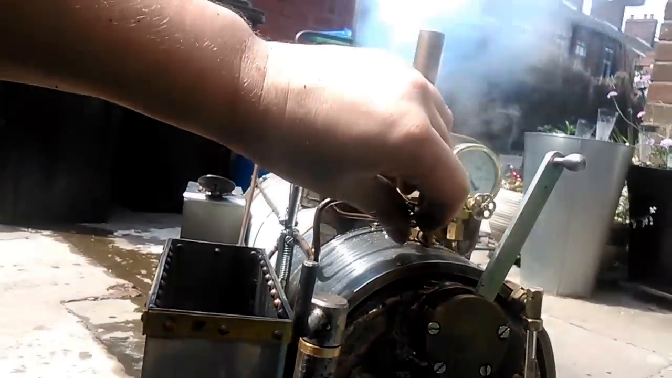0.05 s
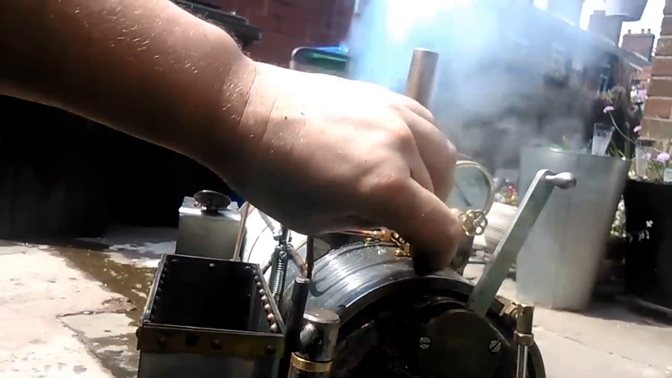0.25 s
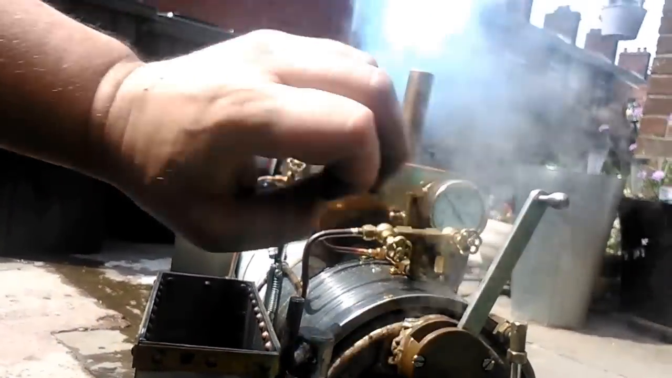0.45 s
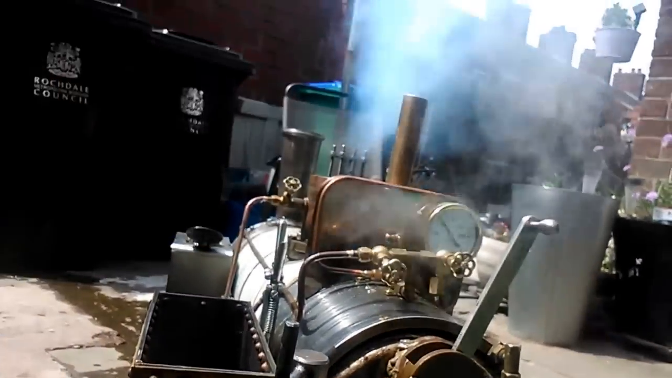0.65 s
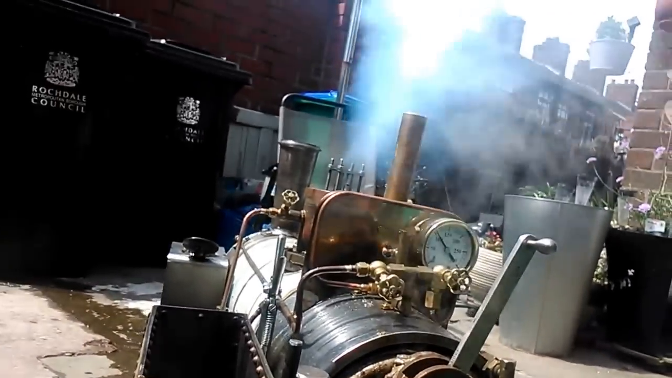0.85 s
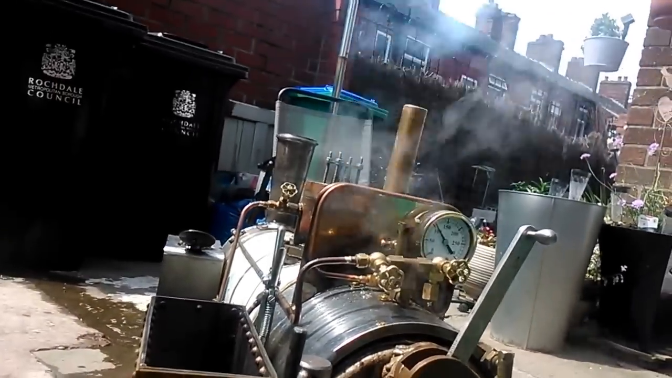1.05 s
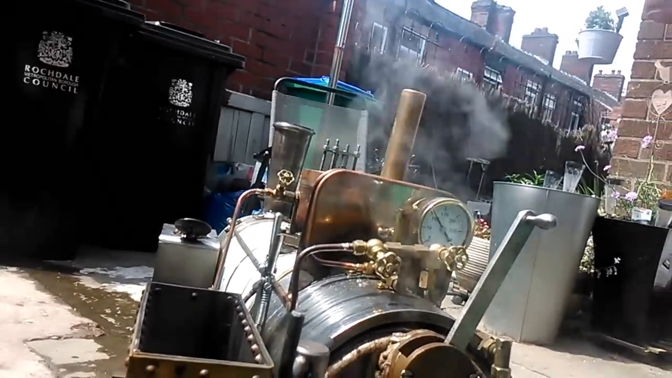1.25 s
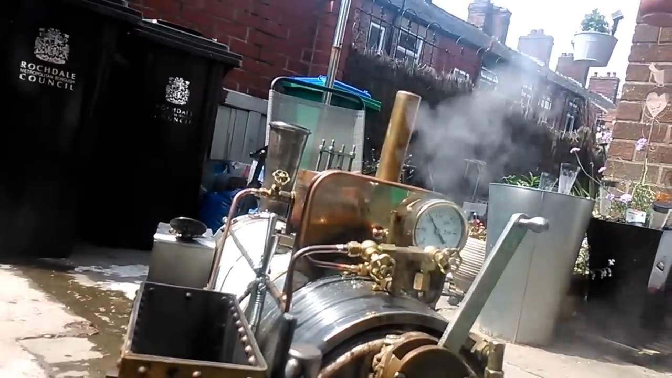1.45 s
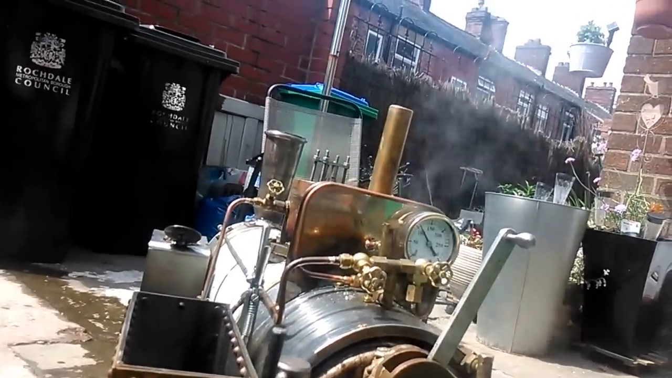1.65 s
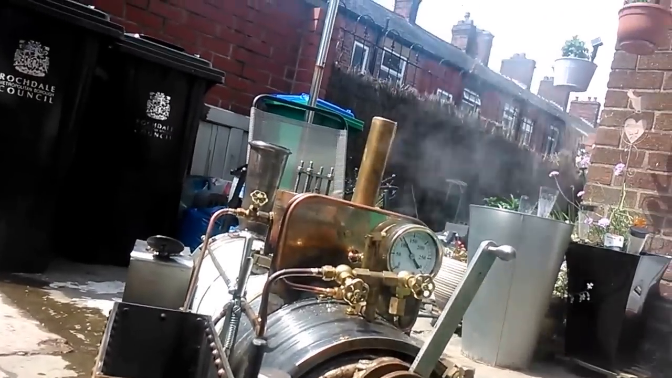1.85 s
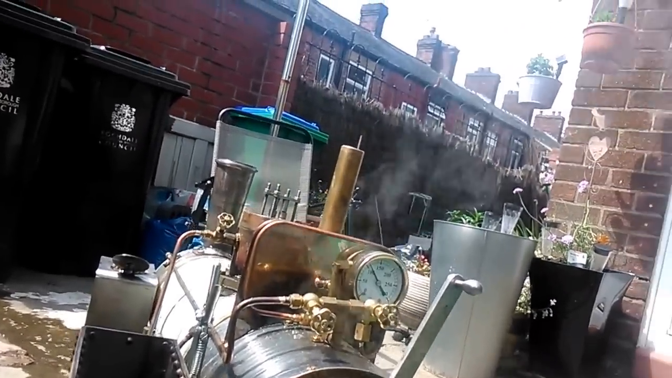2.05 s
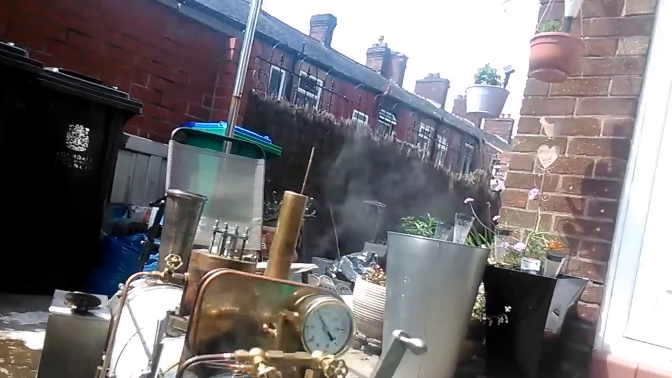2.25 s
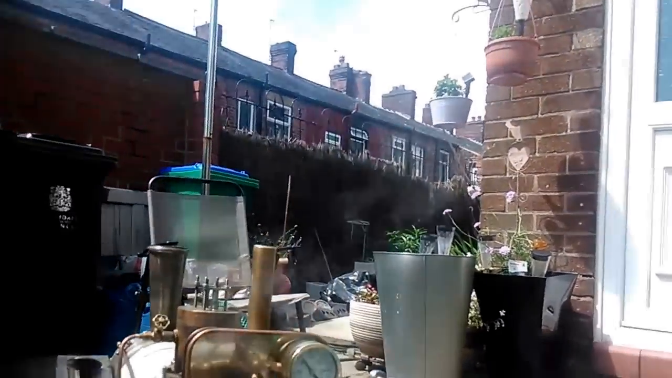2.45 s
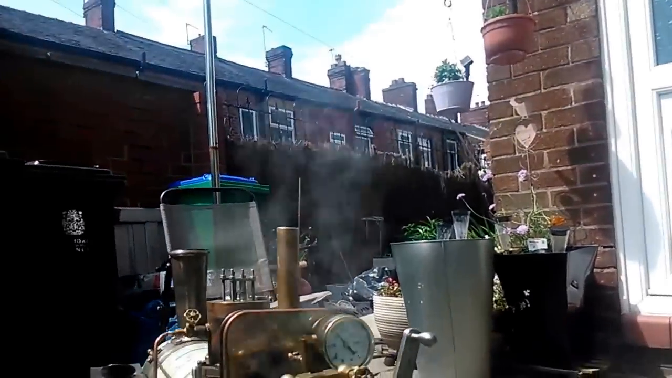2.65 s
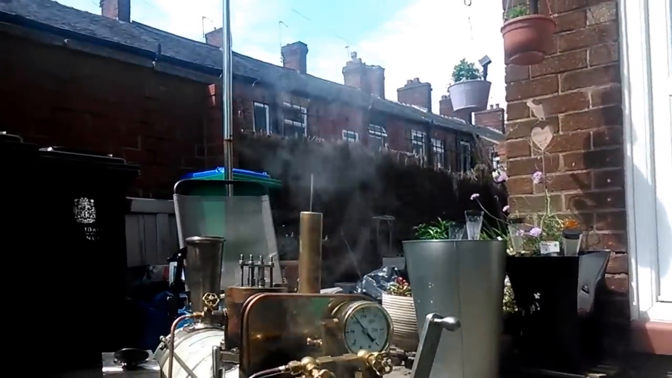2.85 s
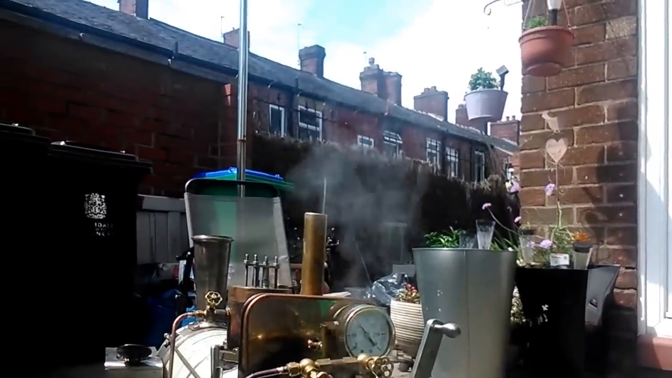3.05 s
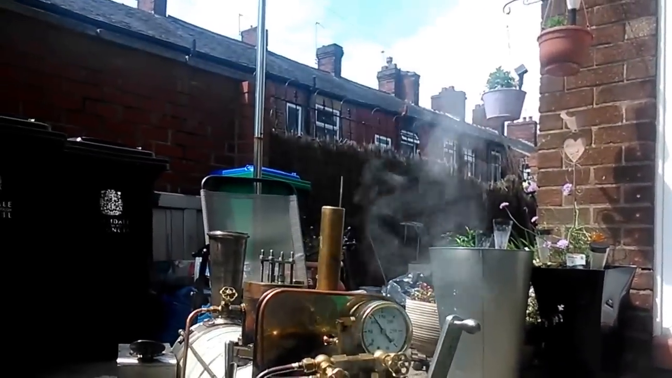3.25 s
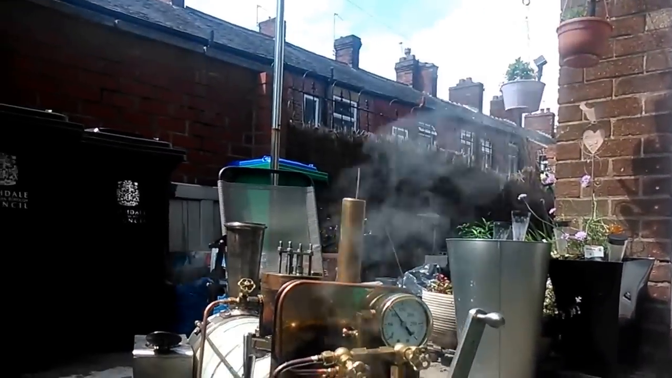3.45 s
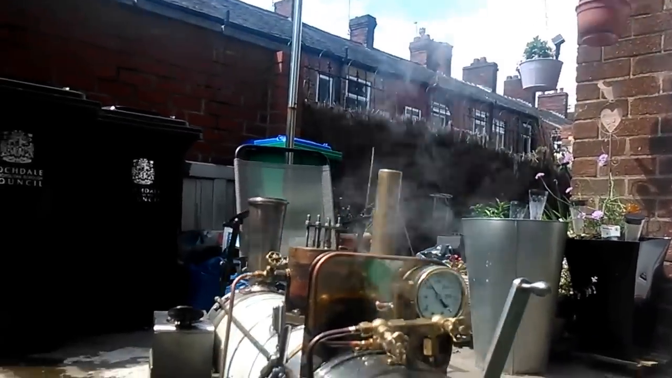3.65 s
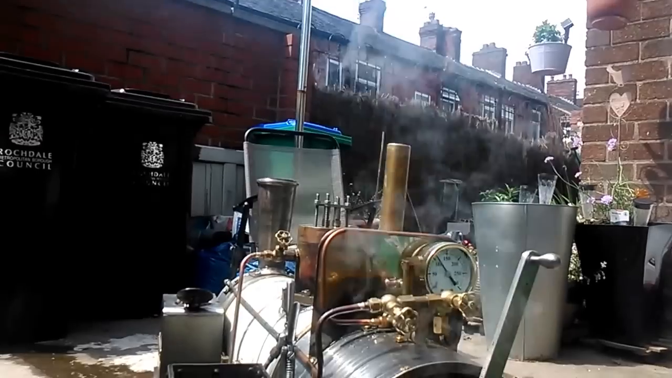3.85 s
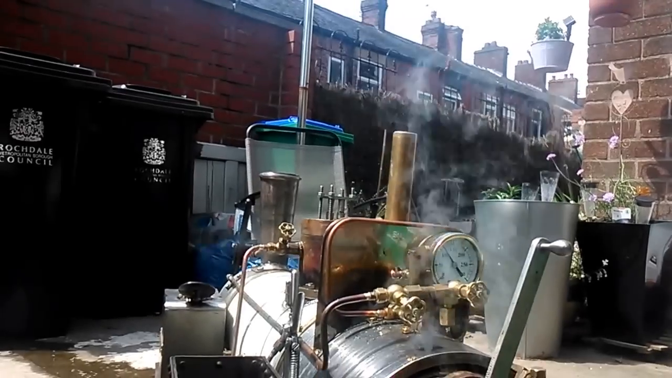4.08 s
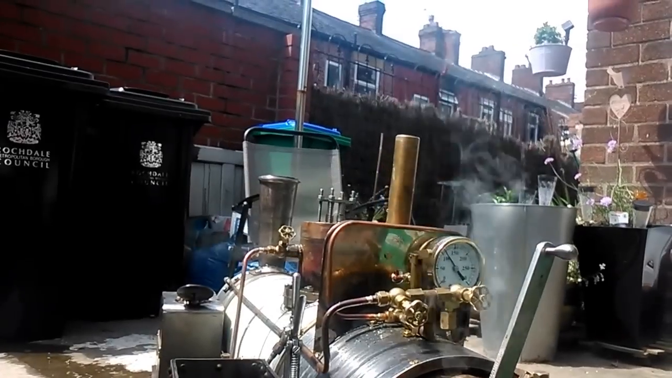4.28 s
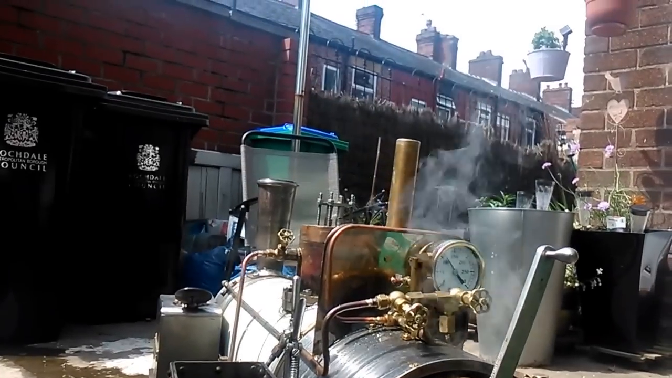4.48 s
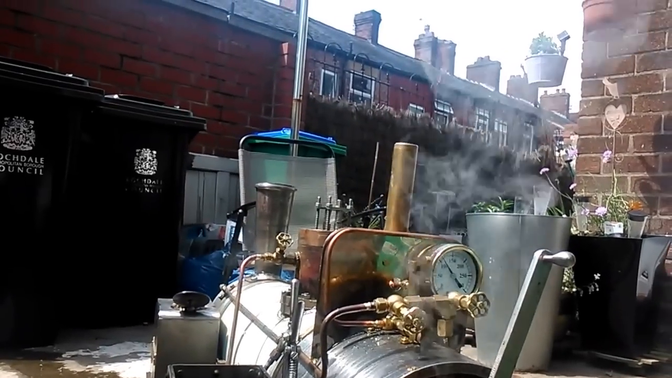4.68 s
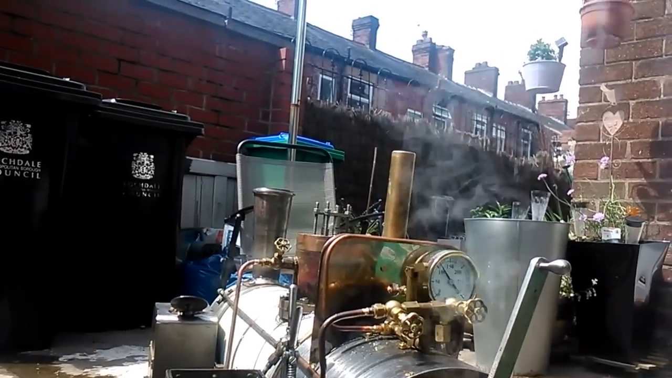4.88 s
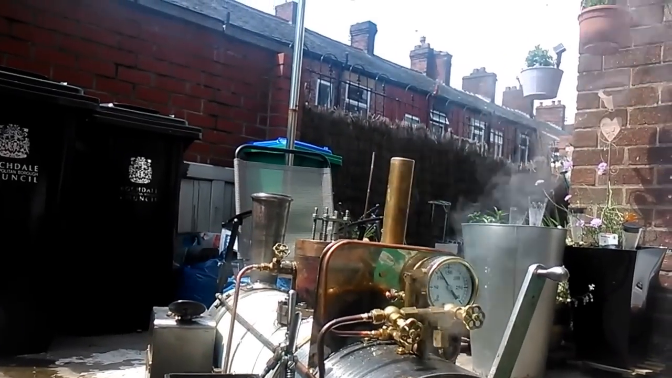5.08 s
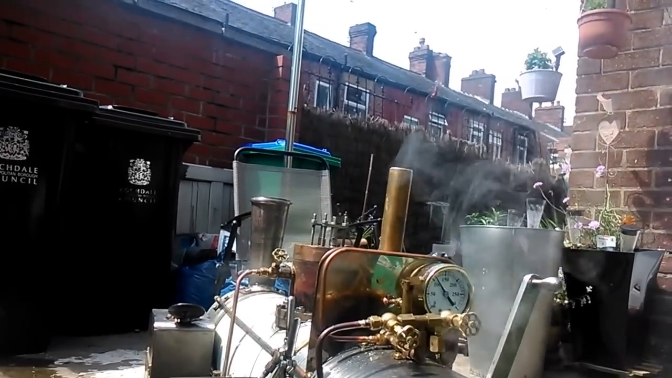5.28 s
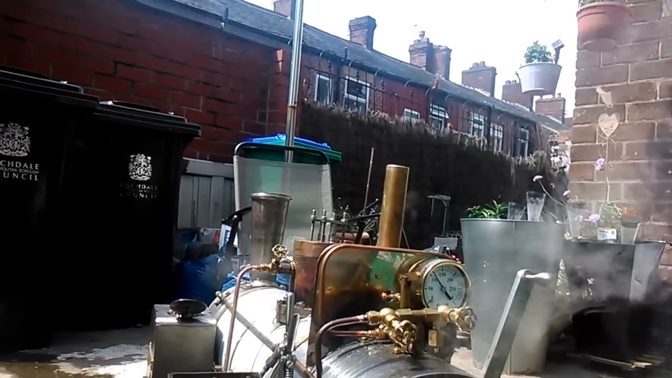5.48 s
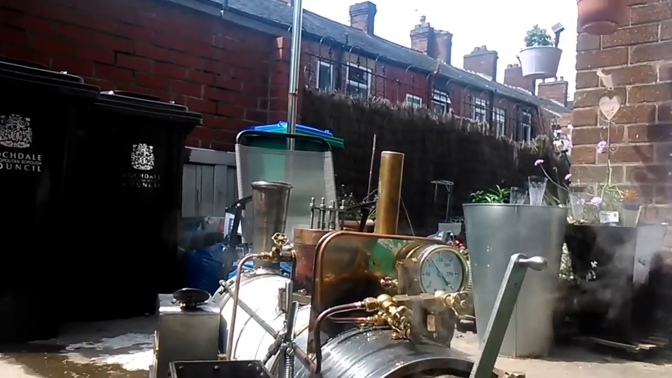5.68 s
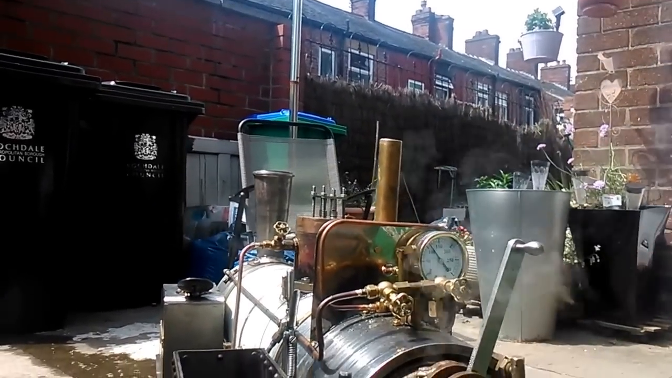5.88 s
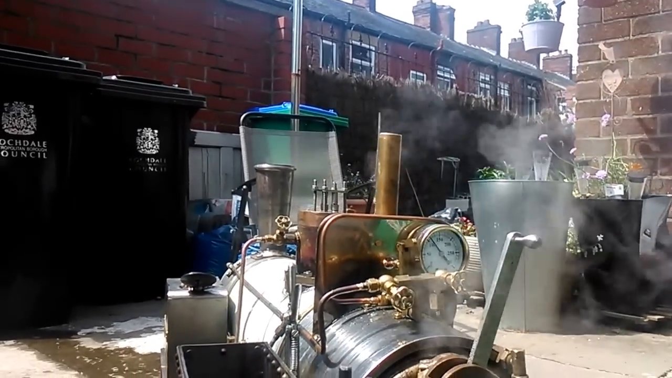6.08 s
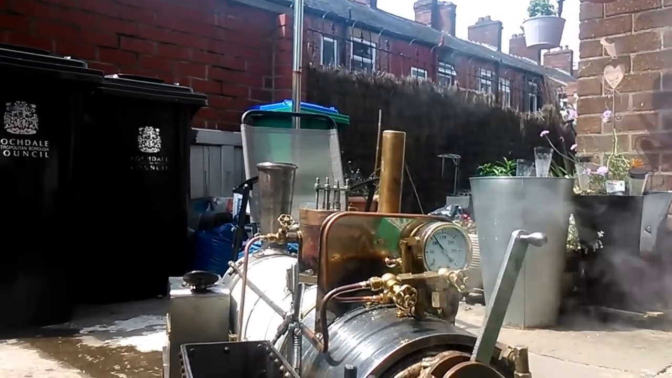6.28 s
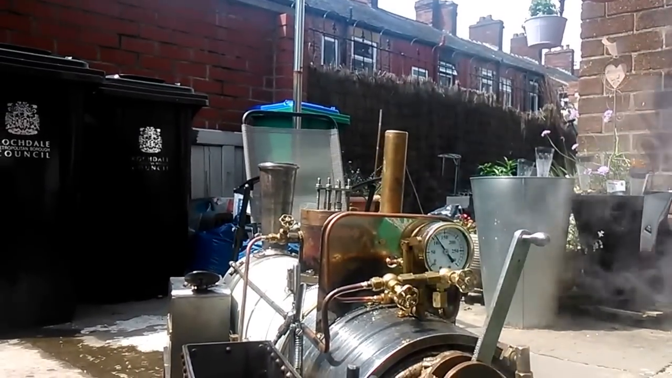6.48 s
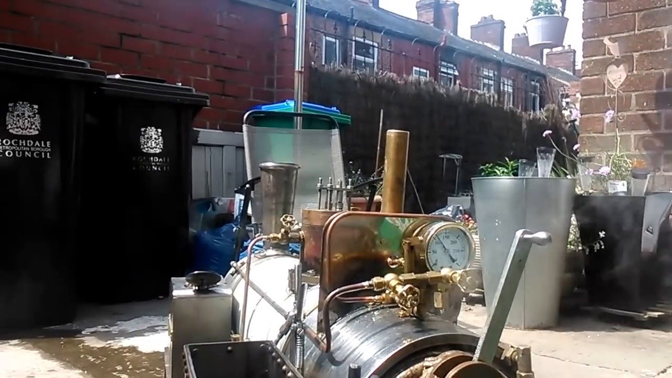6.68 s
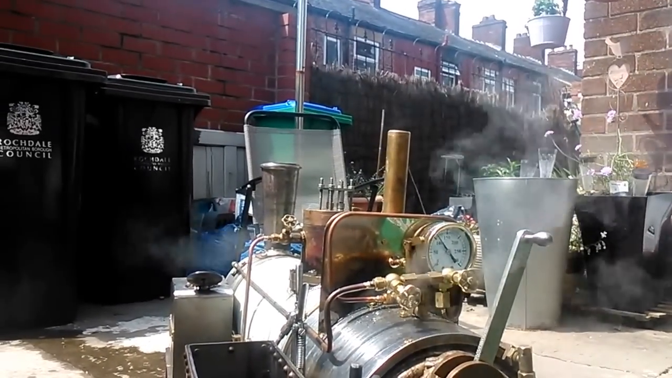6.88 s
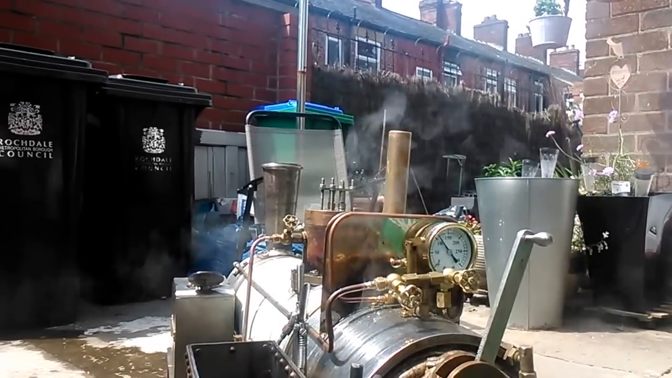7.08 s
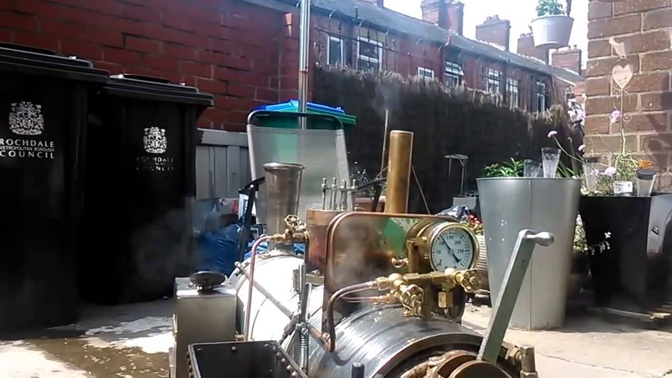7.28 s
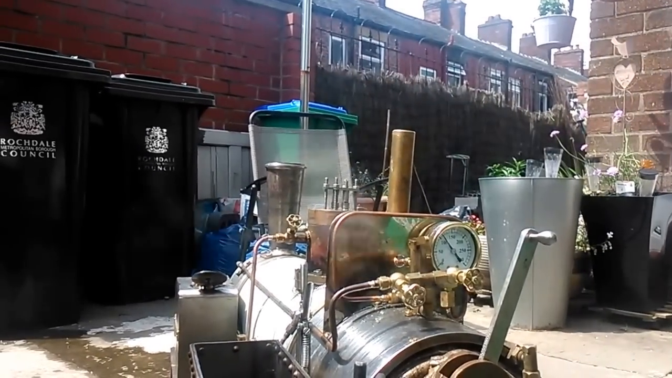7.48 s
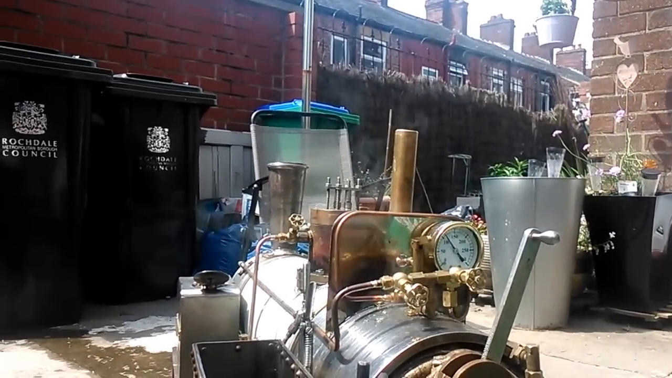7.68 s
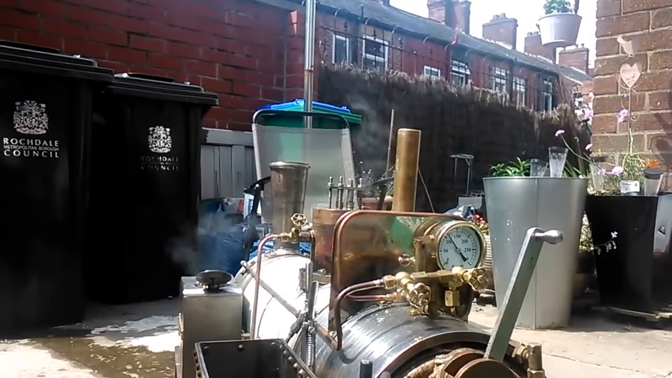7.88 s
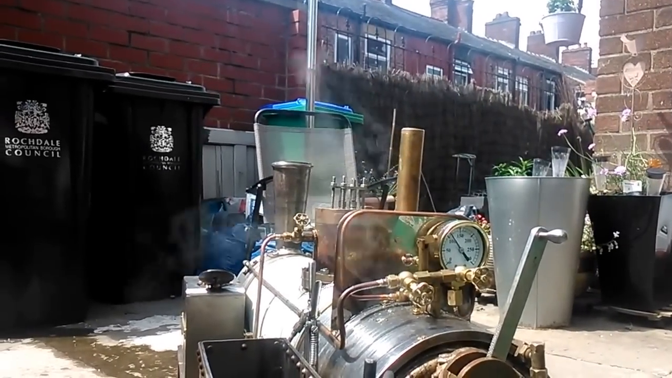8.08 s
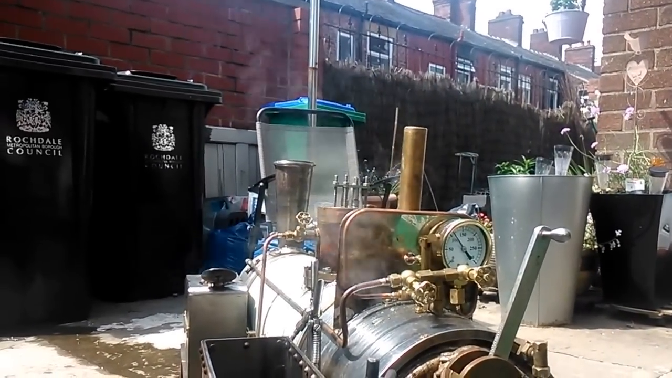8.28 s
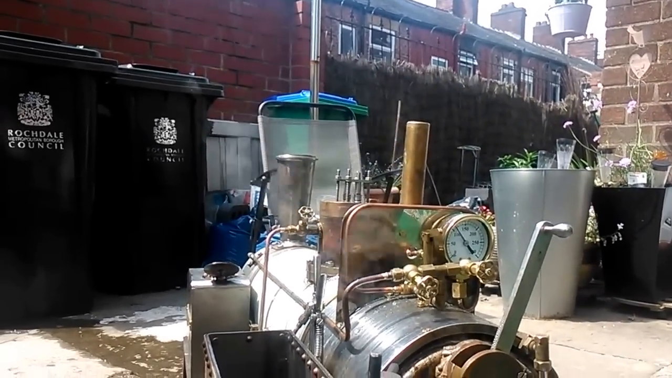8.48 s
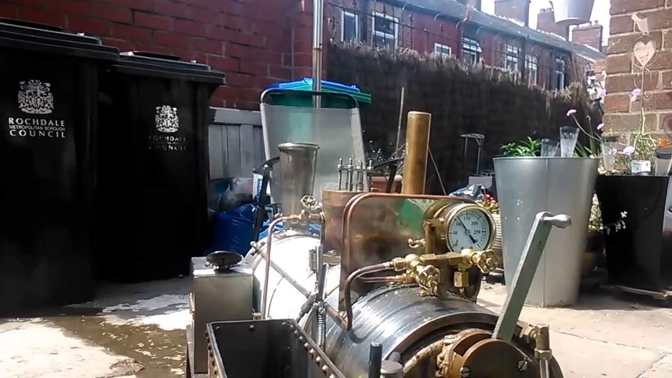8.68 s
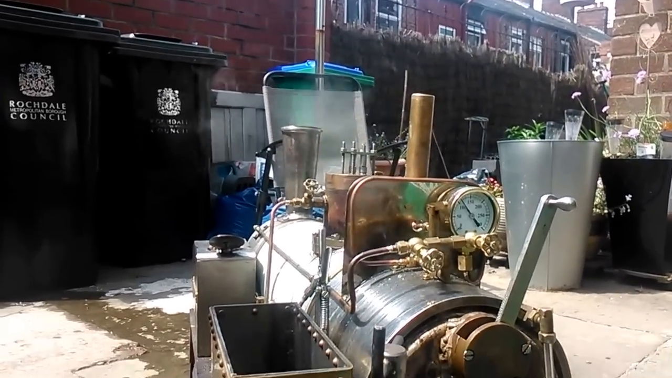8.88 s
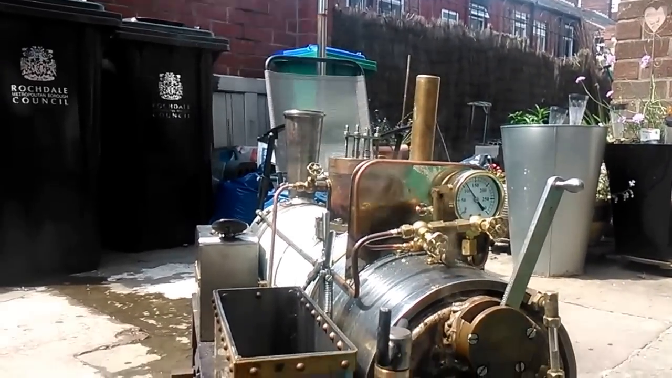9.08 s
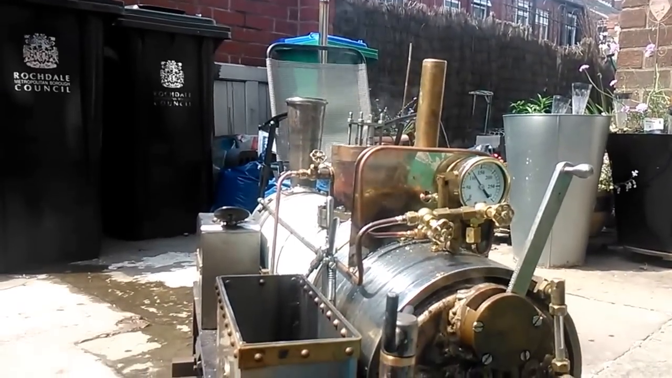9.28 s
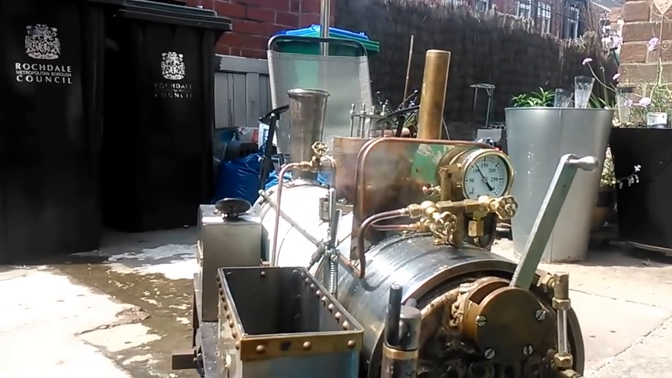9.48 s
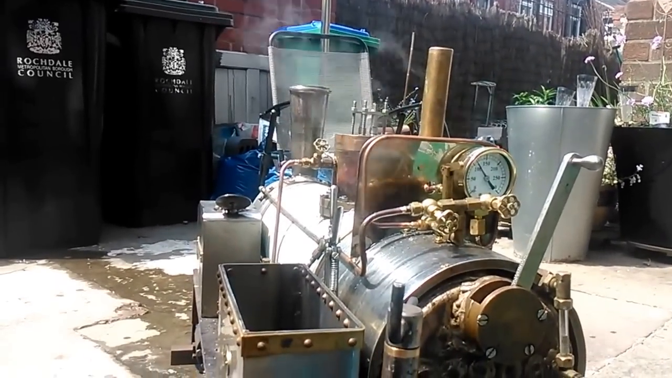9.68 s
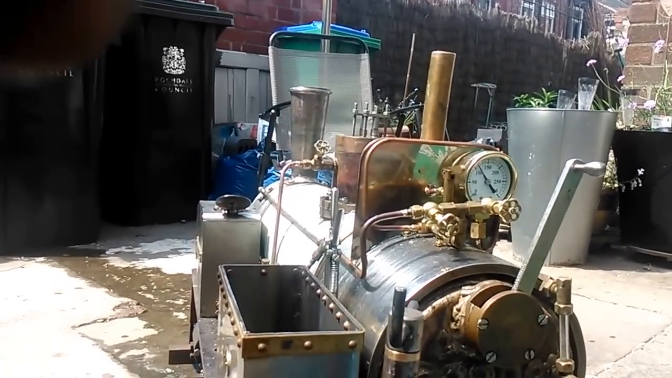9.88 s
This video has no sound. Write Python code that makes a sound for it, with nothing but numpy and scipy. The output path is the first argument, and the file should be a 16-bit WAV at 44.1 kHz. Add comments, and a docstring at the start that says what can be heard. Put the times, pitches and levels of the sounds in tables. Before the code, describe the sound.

Close outdoor sound of a miniature steam engine. A broad, loud steam roar dulls and stops abruptly just after one second. A tiny metallic clink follows, then a quick scraping clatter and a sharp strike that leaves a bright plate ringing. Afterwards only thin, fluttering steam leaks, irregular bubbling sputters in a pipe, and a low, soft fire murmur remain, dry and without echo.

```python
"""A model steam engine's blower roars up the chimney, as coloured noise, until its valve is shut.
A small steel tool clinks, scrapes and squeaks, and a struck plate rings: sums of fading sine waves and noise.
Leaking steam hisses as fluttering noise, with a wetter puff; water sputters as random clicks ringing a pipe.
A dull scuff and soft bumps are shaped noise, and the fire rumbles and murmurs softly as wavering noise.
Loud sound in the upper middle makes the recorder turn itself down for a moment."""
import sys
import numpy as np
from scipy import signal
from scipy.fft import rfft, irfft, next_fast_len
from scipy.io import wavfile

SR = 44100
rng = np.random.default_rng(int(sys.argv[2]) if len(sys.argv) > 2 else 0)


def pcm_store(signal):
    """Save signal as 16-bit PCM."""
    levels = np.round(np.clip(np.atleast_2d(signal), -1, 1) * 32767)
    wavfile.write(sys.argv[1], SR, levels.astype(np.int16).T)


N = 438354
TIME = np.arange(N) / SR  # s

# the tool touches metal: (time [s], level [dB], pitch that the spot favours [Hz])
TOOL_CONTACTS = [(1.461, -42.5, 11000), (1.474, -35, 6000), (1.4789, -21.5, 9760), (1.494, -39, 5300),
                 (2.262, -20, 4800), (2.284, -23, 7530), (2.296, -36, 10200), (2.308, -28, 9150),
                 (2.342, -45, 10300), (2.383, -34.5, 10700), (2.441, -37, 10400), (2.492, -35, 10900),
                 (2.556, -44, 6840), (2.591, -37, 11000)]
# tones at which the tool rings: (frequency [Hz], level [dB], time to fall by 60 dB [s])
TOOL_MODES = [(5346, -17, .36), (6085, -17, .1), (6800, -7, .16), (6852, -3.5, .15), (7962, -12, .24),
              (9076, -13, .22), (10260, -1.5, .1), (10330, -7, .08), (10450, -12, .09), (10950, -12, .13),
              (12040, -16, .11), (12450, -16, .11), (13080, -12, .11), (14330, -9, .1)]
# the blow that sets the plate ringing freely
BLOW_S = 2.592


def from_db(db):
    """Turn decibels into a gain."""
    return 10 ** (np.asarray(db) / 20)


def rms_one(x):
    """Scale a sound to an average strength (rms) of 1."""
    return x / np.sqrt(np.mean(x ** 2) + 1e-20)


def in_time(rows):
    """Join the points of each column with straight lines, giving a value at every sample."""
    s, *columns = np.transpose(rows)
    return [np.interp(TIME, s, column) for column in columns]


def since(s):
    """Seconds gone by since time s; zero before it."""
    return np.maximum(TIME - s, 0)


def gain_at(points, hz):
    """Gain of a (frequency [Hz], level [dB]) table, joined on a log-frequency axis."""
    f, db = np.transpose(points)
    return from_db(np.interp(np.log(hz), np.log(f), db))


def drift(rate):
    """Smooth random wandering with rms 1; a higher rate [Hz] wanders faster."""
    # made at a fortieth of the sample rate; the first 2000 values let the filter settle
    r = np.exp(-80 * np.pi * rate / SR)
    noise = rng.standard_normal(N // 40 + 2002)
    slow = signal.lfilter([1], [1, -2 * r, r * r], noise)[2000:]
    return np.interp(np.arange(N) / 40, np.arange(len(slow)), rms_one(slow))


def turbulence(spectrum, width=None):
    """Churning gas makes noise: random stereo sound of the given colour and width; rms 1."""
    # usual stereo width: (frequency [Hz], side level against mid [dB])
    usual_width = [(200, -47), (700, -32), (1400, -29), (2400, -13.5), (4400, -17), (8000, -27.5),
                   (15000, -110)]
    size = next_fast_len(N)
    hz = np.maximum(np.arange(size // 2 + 1) * SR / size, 1)
    mid, side = rfft(rng.standard_normal((2, size))) * gain_at(spectrum, hz)
    side = side * gain_at(usual_width if width is None else width, hz)
    return rms_one(irfft(np.array([mid + side, mid - side]), size)[:, :N])


def grains(per_s, spread_db):
    """Random clicks of uneven size and either sign; rms 1."""
    size_db = spread_db * np.minimum(rng.exponential(1, N), 4)
    sizes = from_db(size_db) * rng.choice([-1, 1], N)
    return rms_one(sizes * (rng.random(N) < per_s / SR))


def resonate(x, hz, width_hz):
    """Bring out one pitch, with gain 1 on top; a narrower width rings longer."""
    r = np.exp(-np.pi * width_hz / SR)
    feedback = [1, -2 * r * np.cos(2 * np.pi * hz / SR), r * r]
    return signal.lfilter(np.array([1, 0, -1]) * (1 - r * r) / 2, feedback, x + 1e-18)


def cut(x, hz, kind, order=2):
    """Keep only what lies below ("low") or above ("high") a frequency."""
    sections = signal.butter(order, min(hz, SR / 2 - 1), kind, fs=SR, output="sos")
    return signal.sosfilt(sections, x)


def smooth(x, seconds):
    """Follow x with a lag."""
    r = np.exp(-1 / (seconds * SR))
    return signal.lfilter([1 - r], [1, -r], x + 1e-18)


def add(out, s, sound):
    """Mix a sound in from time s."""
    at = round(s * SR)
    out[..., at:at + sound.shape[-1]] += sound[..., :N - at]


def blower(split_hz=2000):
    """The jet roars steadily in the chimney, dulls as the valve closes and ends in a thin hiss."""
    # colour of the roar: (frequency [Hz], relative level per Hz [dB])
    roar_colour = [(20, -34), (30, -25), (58, -4), (85, -3.5), (300, -3.5), (650, -3.5), (1000, -4),
                   (1550, -5), (2700, -6.5), (4500, -12), (7400, -17.5), (10000, -19), (14000, -21),
                   (16000, -25)]
    # stereo width of the jet: (frequency [Hz], side level against mid [dB])
    jet_width = [(3000, -60), (3900, -15), (8000, -14)]
    # the roar sags while the valve is turned, then dies as it seats
    blower_db, turn_s, sag_db_per_s, dull_db_per_s = -15.5, 1.05, 14, 14
    shut_s, shut_db_per_s = 1.176, 600
    # trapped steam bleeds off
    bleed_db, bleed_end_s, bleed_db_per_s, bleed_low_hz = -43.5, 1.324, 165.5, 3000

    jet = turbulence(roar_colour, jet_width)
    treble = from_db(-dull_db_per_s * since(turn_s))
    roar = treble * jet + (1 - treble) * cut(jet, split_hz, "low")
    roar_db = blower_db - sag_db_per_s * since(turn_s) - shut_db_per_s * since(shut_s)
    bleed = cut(jet, bleed_low_hz, "high", order=4) * (TIME > shut_s)
    bleed_gain = from_db(bleed_db - bleed_db_per_s * since(bleed_end_s))
    return from_db(roar_db) * roar + bleed_gain * bleed


def strike(modes, level_db, emphasis_db, lead=0.0028, vary_db=2.2, contact_s=0.0017):
    """One blow rings every mode, each with its own emphasis; the left leads by a tiny phase [rad]."""
    t, out = TIME[:SR], 0
    phase = np.array([[lead], [-lead]])
    for (hz, db, t60), extra_db in zip(modes, emphasis_db):
        height_db = level_db + db + extra_db + vary_db * rng.standard_normal()
        out = out + from_db(height_db - 60 * t / t60) * np.sin(2 * np.pi * hz * t + phase)
    # the swing builds up while the parts touch
    return out * (1 - np.exp(-(t / contact_s) ** 2))


def tool(crack_db=-5, crack_t60=0.022, crack_hz=5000, tick_db=-17, tick_t60=0.022):
    """Each contact rings the tool, with a brief gritty crack and a fainter, full-bodied tick."""
    # the spot where the tool touches brings out the modes near one pitch
    most_favour_db, favour_octaves = 15, 0.21
    out, t, tool_hz = np.zeros((2, N)), TIME[:SR], np.array(TOOL_MODES)[:, 0]
    for s, tool_db, favoured_hz in TOOL_CONTACTS:
        octaves_off = np.log2(tool_hz / favoured_hz)
        favour_db = most_favour_db * np.exp(-(octaves_off / favour_octaves) ** 2)
        ring = strike(TOOL_MODES, tool_db, favour_db)
        grit = from_db(tool_db + crack_db - 60 * t / crack_t60) * rng.standard_normal(SR)
        crack = cut(grit, crack_hz, "high", order=6)
        tick = from_db(tool_db + tick_db - 60 * t / tick_t60) * rng.standard_normal(SR)
        add(out, s, ring + crack + tick)
    return out


def scrape():
    """Around each contact the tool drags over the metal; the tiny slips keep its modes ringing unevenly."""
    scrape_db, ring_db, rise_s, fall_s, low_hz = -12, 25.5, 0.0034, 0.015, 5300
    drag = np.zeros(N)
    for s, tool_db, *_ in TOOL_CONTACTS:
        fade = np.maximum((s - TIME) / rise_s, (TIME - s) / fall_s)
        drag += from_db(tool_db) * np.exp(-np.minimum(fade, 20))
    slips = drag * cut(grains(per_s=3800, spread_db=0.0), low_hz, "high", order=6)
    ringing = 0
    for hz, db, t60 in TOOL_MODES:
        width_hz = np.log(1000) / (np.pi * t60)  # a long ring means a narrow resonance
        ringing = ringing + from_db(db) * resonate(slips, hz, width_hz)
    return from_db(scrape_db) * slips + from_db(ring_db) * ringing


def squeaks(rough_db=3):
    """The tool skids on the plate: a gritty chirp that shoots up in pitch."""
    # skids: (time [s], level [dB])
    skids = [(2.307, -35), (2.3395, -43), (2.381, -33), (2.404, -42), (2.44, -31), (2.59, -31)]
    start_hz, hz_per_s, swell_s = 3140, 140000, 0.0012
    out, t = np.zeros(N), TIME[:SR // 60]
    age = t / swell_s
    swell = age * np.exp(1 - age)
    chirp = swell * np.sin(2 * np.pi * (start_hz * t + .5 * hz_per_s * t ** 2))
    for s, db in skids:
        add(out, s, from_db(db) * chirp)
    return out * from_db(rough_db * drift(200))


def held_plate(contact_s=0.0013, chatter_db=2.7):
    """Each nudge stops the held plate's ring and starts a new one; the loose grip makes it chatter."""
    # nudges: (time [s], low mode level [dB], middle pair level [dB], high mode level [dB])
    nudges = [(1.465, -44, -70, -70), (1.5, -57, -73, -75), (2.262, -35, -64, -49),
              (2.309, -34.5, -59, -65), (2.343, -44, -65, -70), (2.383, -24.5, -39, -62),
              (2.406, -33.5, -52, -65), (2.441, -30, -48, -60), (2.466, -40, -50, -63),
              (2.493, -34, -39, -40), (2.557, -31, -48, -36)]
    # tones of the held plate: (frequency [Hz], time to fall by 60 dB [s], column of nudges [index])
    held_modes = [(3079, .8, 1), (3908, .2, 2), (4091, .22, 2), (4938, 1.5, 3)]
    out = 0
    for hz, t60, column in held_modes:
        swing = np.zeros(N)
        for row in nudges:
            fresh = from_db(row[column] - 60 * since(row[0]) / t60)
            swing = np.where(TIME < row[0], swing, fresh)
        swing = smooth(swing * (TIME < BLOW_S), contact_s)
        out = out + swing * from_db(chatter_db * drift(60)) * np.sin(2 * np.pi * hz * TIME)
    return out


def knock(knock_db=-27, knock_t60=0.026, low_hz=1300, high_hz=4200, crack_db=-31, crack_t60=.023):
    """The blow itself: a sharp crack and a short clatter that gives the ring its body."""
    out, t = np.zeros(N), TIME[:SR // 4]
    clatter, crack = rng.standard_normal((2, len(t)))
    clatter = rms_one(cut(clatter, high_hz, "low", order=4)) * from_db(knock_db - 60 * t / knock_t60)
    crack = crack * from_db(crack_db - 60 * t / crack_t60)
    add(out, BLOW_S, cut(clatter + crack, low_hz, "high", order=6))
    return out


def free_plate(long_share=0.51, settle_t60=0.34, contact_s=0.0028, low_build_s=0.0057,
               waver_db=1.3, sway_hz=0.45, stilled_s=2.99, stilled_t60=1.0):
    """The struck plate loses part of its swing quickly, then sings on, wavering as it sways, until damped."""
    # tones of the free plate: (frequency [Hz], level [dB], time to fall by 60 dB [s])
    plate_modes = [(1427, -28, .45), (1500, -32, .3), (2331, -22, .19), (2990, -27, .15), (3760, -20, .09),
                   (3908.5, -8.5, 1.15), (4090.5, -1, 1.2), (4270, -21, .09), (4939, -7.5, .7),
                   (5351, -18, .75), (6008, -29, 1.0), (6088, -25, 1.05), (6864, -28, .3), (8603, -29, .4),
                   (9884, -24, .3), (11220, -29, .4), (14320, -27, .15)]
    blow_db = -10
    # the lowest mode splits into a beating pair once the plate lifts clear
    low_hz, split_hz, low_db, twin_db, low_t60, clear_s = 3079, 21.7, -6, 0.5, 1.4, 0.013
    t = since(BLOW_S)
    settle = long_share + (1 - long_share) * from_db(-60 * t / settle_t60)

    def partial(hz, db, t60, ahead=0):
        """One decaying mode, a little unsteady in level and pitch; ahead is in cycles."""
        sway = np.cumsum(sway_hz * drift(9.1) * (t > 0)) / SR
        cycles = hz * t + ahead + sway
        return from_db(db - 60 * t / t60 + waver_db * drift(12)) * np.sin(2 * np.pi * cycles)

    upper = sum(partial(hz, db, t60) for hz, db, t60 in plate_modes) * settle
    low = partial(low_hz, low_db, low_t60)
    twin = partial(low_hz, low_db + twin_db, low_t60, split_hz * since(BLOW_S + clear_s))
    upper = upper * (1 - np.exp(-(t / contact_s) ** 2))
    pair = (low + twin) * long_share * (1 - np.exp(-t / low_build_s))
    return (upper + pair) * from_db(blow_db - 60 * since(stilled_s) / stilled_t60)


def uneven(x, patchy_db=4.0, per_s=6, count=22):
    """Narrow bands of a hiss wax and wane, each by itself; rms 1."""
    size = next_fast_len(N)
    spectrum, hz = rfft(x, size), np.arange(size // 2 + 1) * SR / size
    centres = np.geomspace(3000, 8000, count)
    out = 0
    for share in np.eye(count):
        band = irfft(spectrum * np.interp(hz, centres, share), size)[:, :N]
        out = out + band * from_db(patchy_db * drift(per_s))
    return rms_one(out)


def leaks(spit_db=-12, spit_hz=6500, easing_s=0.073, flutter_db=1.16, seep_db=-56, seep_flutter_db=1.6):
    """Thin jets hiss and flutter at the fittings, at times whistling, with a fine crackle of droplets."""
    # leaking steam: (time [s], hiss level [dB], level of the finest, highest jet [dB])
    leak_levels = [(1.28, -38.5, -50), (1.41, -57, -45), (1.54, -38.5, -39.5), (2.05, -42.5, -42.5),
                   (2.2, -46, -37.5), (2.3, -39, -42), (2.55, -35.5, -38), (2.75, -42, -47),
                   (3.07, -41, -39), (3.23, -49.5, -49), (3.43, -38, -37), (3.6, -41.5, -42.5),
                   (3.85, -46, -45), (4.08, -45.5, -46), (4.2, -40, -41), (4.35, -43.5, -45),
                   (4.68, -46.5, -48), (4.85, -43, -43), (5.25, -43, -42), (5.5, -38.5, -39.5),
                   (5.75, -41, -40), (6.2, -42.5, -38.5), (6.6, -42, -40.5), (7.2, -40.5, -40.5),
                   (7.7, -40.5, -39), (8.2, -44, -40.5), (8.35, -41.5, -41), (8.6, -43.5, -39),
                   (8.8, -41, -42.5), (9.2, -43, -43), (9.37, -39.5, -41), (9.94, -45.5, -47.5)]
    # edges and faint whistles: (start [s], end [s], frequency [Hz], width [Hz], gain on the jets [dB])
    whistle_rows = [(1.3, 2.198, 8900, 1500, 2), (3.4, 4.1, 14450, 200, -7), (3.3, 4.7, 9900, 2500, -23),
                    (4.15, 4.65, 9800, 180, 4), (5.2, 6.2, 9950, 100, -10), (5.3, 8.7, 14500, 200, -7)]
    # colours of hiss, finest jet and seeping steam: (frequency [Hz], relative level per Hz [dB])
    hiss_colour = [(3000, -35), (4600, -20.5), (6200, -13), (7000, -9), (8000, -7), (9500, 0), (10800, 0.5),
                   (12000, -3), (14000, -20), (16000, -35)]
    fine_colour = [(8000, -28), (10500, -7.5), (12000, -1), (13500, 0.5), (15500, -.5), (16500, 0),
                   (18000, -40)]
    seep_colour = [(2000, -23), (3000, -0.5), (3700, 1), (4100, 2), (4550, -5.5), (5000, -1), (5550, 0.5),
                   (6100, -6.5), (6900, 0), (9000, -28), (14000, -40)]

    hiss_db, fine_db = in_time(leak_levels)
    droplets = grains(per_s=500, spread_db=4)
    crackle = from_db(spit_db) * cut(droplets, spit_hz, "high", order=4)
    hiss = from_db(hiss_db + flutter_db * drift(11)) * (turbulence(hiss_colour) + crackle)
    fine = from_db(fine_db + flutter_db * drift(20)) * turbulence(fine_colour)
    jets = hiss + fine
    whistles = 0
    for start, end, hz, width, db in whistle_rows:
        swell = .5 * (np.tanh((TIME - start) / easing_s) - np.tanh((TIME - end) / easing_s))
        whistles = whistles + swell * from_db(db) * resonate(jets, hz, width)
    seep = from_db(seep_db + seep_flutter_db * drift(20)) * uneven(turbulence(seep_colour))
    return jets + whistles + seep


def puff():
    """A spit of wetter, lower-pitched steam from one fitting swells quickly and trails off."""
    # colour of the puff: (frequency [Hz], relative level per Hz [dB])
    puff_colour = [(2500, -18), (3400, -1), (4500, -8), (5600, 3), (7500, -20), (10000, -25)]
    start_s, level_db, rise_s, fall_db_per_s = 5.95, -47.5, 0.062, 23
    rise = np.minimum(since(start_s) / rise_s, 1)
    return rise * from_db(level_db - fall_db_per_s * since(start_s)) * turbulence(puff_colour)


def spurts(spurt_db=-5, spurt_t60=0.12):
    """Water flows in spurts that start at once and die away."""
    # spurts: (time [s], level before spurt_db is added [dB])
    spurt_rows = [(2.9127, -29), (3.3243, -38), (3.4833, -37), (4.195, -31), (4.616, -33.5), (5.01, -36),
                  (5.2866, -29), (5.703, -35), (5.8052, -32), (5.8966, -30.5), (6.061, -32), (6.1546, -28),
                  (6.2762, -30.5), (6.4487, -33), (6.707, -29.5), (6.8384, -28), (6.9696, -33),
                  (7.1142, -30.5), (7.2873, -37), (7.4944, -27.5), (7.5398, -29), (7.5966, -33),
                  (7.744, -26), (7.879, -24), (7.9818, -31), (8.1858, -29.5), (8.2776, -30),
                  (8.3167, -27.5), (8.389, -35), (8.506, -31), (8.636, -36), (8.942, -28.5), (9.326, -34)]
    flow = np.zeros(N)
    for s, db in spurt_rows:
        add(flow, s, from_db(db + spurt_db - 60 * TIME[:SR // 2] / spurt_t60))
    return flow


def sputter(unrest_db=2.2, low_hz=1700, high_hz=3000, wander_db=2.1):
    """Bursting bubbles ring a pipe: a restless simmer with spurts on top."""
    # water simmering in the pipe: (time [s], level [dB])
    simmer_levels = [(1.65, -56.5), (2.0, -48.5), (2.4, -56.5), (3.0, -52), (3.55, -44.5), (3.9, -56.5),
                     (4.2, -47.5), (4.8, -53), (5.3, -47), (7.2, -47.5), (8.1, -47), (8.8, -49),
                     (9.94, -52.5)]
    # pipe resonances: (frequency [Hz], width [Hz], level [dB])
    pipe_modes = [(1793, 22, 0), (1870, 30, -4), (1958, 22, -8), (2022, 26, 2), (2090, 260, -13),
                  (2290, 60, -18), (2368, 28, -5.5), (2803, 36, -12)]
    # for a while the pipe's lowest resonance sings out
    sing_s, sing_width_s, sing_db = 8.54, 0.36, 7.5

    level_db, = in_time(simmer_levels)
    simmer = from_db(level_db + unrest_db * drift(17.5))
    flow = np.hypot(simmer, spurts())
    bursts = grains(per_s=600, spread_db=2.0)
    # two versions side by side: a steady flow and the real one
    drive = cut(np.array([bursts, bursts * flow]), low_hz, "high", order=6)
    drive = cut(drive, high_hz, "low", order=6)
    modes = []
    for k, (hz, width, db) in enumerate(pipe_modes):
        # neighbouring modes swing in opposite senses, each waxing and waning as the water shifts
        gain = (-1) ** k * from_db(db + wander_db * drift(1.76))
        modes.append(gain * resonate(drive, hz, width))
    steady, driven = sum(modes)
    singing = from_db(sing_db) * np.exp(-((TIME - sing_s) / sing_width_s) ** 2) * modes[0][1]
    # the steady flow sets the scale
    return (driven + singing) / np.std(steady)


def scuff(rough_db=2):
    """A short, rough rub beside the engine: quick attack, brief hold, slower release, then a higher rasp."""
    # colour of the rub: (frequency [Hz], relative level per Hz [dB])
    scuff_colour = [(100, -14), (210, 17), (380, -4), (600, -9), (1000, 8), (1380, 15), (1750, -9),
                    (2800, -14), (4000, -35)]
    start_s, rub_db, attack_s, hold_s, fall_db_per_s = 1.83, -38.5, 0.0057, 0.026, 113
    rasp_s, rasp_swell_s, rasp_db, rasp_hz, rasp_width_hz = 1.94, 0.048, -42.5, 2830, 290
    attack = np.minimum(since(start_s) / attack_s, 1)
    level_db = rub_db - fall_db_per_s * since(start_s + attack_s + hold_s)
    rub = attack * from_db(level_db) * turbulence(scuff_colour)
    rasp = resonate(rng.standard_normal(N), rasp_hz, rasp_width_hz)
    rasp = rms_one(resonate(rasp, rasp_hz, rasp_width_hz))
    swell = from_db(rasp_db) * np.exp(-((TIME - rasp_s) / rasp_swell_s) ** 2)
    return from_db(rough_db * drift(60)) * (rub + swell * rasp)


def bumps(body_hz=280, width_hz=170, swell_s=0.0051):
    """Soft bumps of handling: dull noise that swells and fades within a few hundredths of a second."""
    # bumps: (time [s], level at the top of the swell [dB])
    bump_rows = [(1.854, -35.5), (2.51, -47.5), (2.814, -44.5), (3.032, -41)]
    push, age = np.zeros(N), TIME[:SR // 4] / swell_s
    for s, db in bump_rows:
        add(push, s, from_db(db) * age * np.exp(1 - age))
    body = resonate(rng.standard_normal(N), body_hz, width_hz)
    return push * rms_one(resonate(body, body_hz, width_hz))


def fire(flame_db=1, rumble_db=-1.0, flue_db=2.0, flicker_db=1.5, lump_db=3.5, waver_db=2.05):
    """Flames flutter in the boiler and the flue murmurs, over a lumpy rumble of air."""
    # levels here are those before flame_db, rumble_db and flue_db are added
    # draught through the fire: (time [s], flame level [dB], rumble level [dB])
    draught = [(1.55, -64.5, -54), (2.0, -52.5, -49.5), (2.45, -61.5, -59), (3.0, -62, -46),
               (3.9, -57, -53), (4.45, -60, -51), (4.8, -50.5, -45), (5.15, -55, -41), (5.45, -49, -47.5),
               (6.3, -55, -47.5), (6.55, -58, -49), (7.0, -51.5, -48), (7.5, -58, -50.5), (8.3, -53, -46.5),
               (9.94, -50.5, -43.5)]
    # gas flowing through the flue: (time [s], level [dB])
    flue_levels = [(1.3, -61.5), (1.7, -58.5), (1.95, -49), (2.4, -61.5), (3.1, -55.5), (4.7, -56.5),
                   (6.25, -51), (7.2, -54), (8.5, -50.5), (9.94, -50.5)]
    # colours of flames, rumble and murmur: (frequency [Hz], relative level per Hz [dB])
    flame_colour = [(60, 4), (150, -8.5), (240, 2.5), (360, 2), (480, -9), (700, -13), (1500, -29),
                    (6000, -32)]
    rumble_colour = [(20, -38), (35, -17), (50, 8), (70, -1), (110, -0.5), (180, -14.5), (400, -40),
                     (2000, -60)]
    murmur_colour = [(300, -20), (520, 1), (720, -2.5), (930, 5), (1060, -4.5), (1300, 1.5), (1500, 2.5),
                     (1640, -1), (2200, 0.5), (2700, 4), (3150, -7), (3700, -14.5), (4500, -39)]

    flame, rumble = in_time(draught)
    flue, = in_time(flue_levels)
    flames = from_db(flame + flame_db + flicker_db * drift(11.5)) * turbulence(flame_colour)
    murmur = from_db(flue + flue_db + waver_db * drift(16.4)) * turbulence(murmur_colour)
    air = from_db(rumble + rumble_db + lump_db * drift(6.9)) * turbulence(rumble_colour)
    return flames + murmur + air


def scene():
    """Add up all the sources, with no echo."""
    metal = tool() + scrape() + squeaks() + held_plate() + knock() + free_plate()
    steam_and_water = leaks() + puff() + sputter()
    return blower() + metal + steam_and_water + scuff() + bumps() + fire()


def gain_control(x):
    """Loud sound in the upper middle pulls the gain down; it creeps back afterwards."""
    above_db, sense_hz, sense_width_hz = -27.5, 4275, 684
    window_s, attack_s, release_db_per_s = 0.017, 0.045, 25
    sensed = resonate(x.mean(axis=0), sense_hz, sense_width_hz)
    sensed_db = 10 * np.log10(smooth(sensed ** 2, window_s))
    over_db = np.maximum(sensed_db - above_db, 0)
    # hold each excess, letting it shrink at the release rate
    recovery_db = release_db_per_s * TIME
    held_db = np.maximum.accumulate(over_db + recovery_db) - recovery_db
    return x * from_db(-smooth(held_db, attack_s))


def record(dry):
    """The gain ducks, the highest peaks are rounded off and the treble is cut steeply."""
    cutoff_hz, top = 15700, .6
    ducked = gain_control(dry)
    rounded = ducked / (1 + (ducked / top) ** 6) ** (1 / 6)
    steep = signal.ellip(12, .1, 90, cutoff_hz, fs=SR, output="sos")
    return signal.sosfilt(steep, rounded)


dry = scene()
out = record(dry)
pcm_store(out)
```